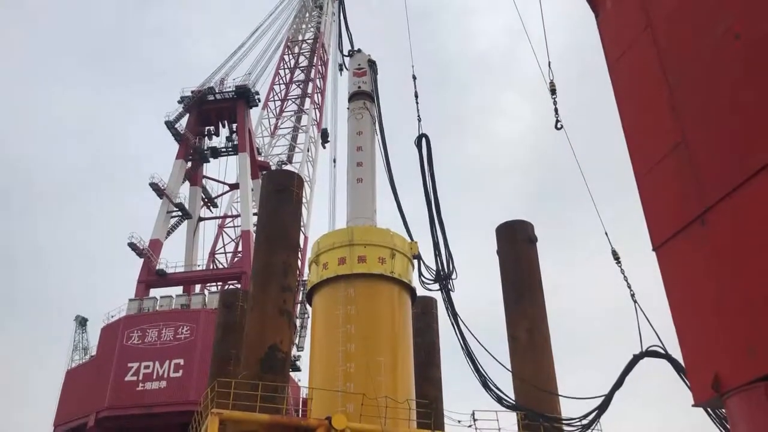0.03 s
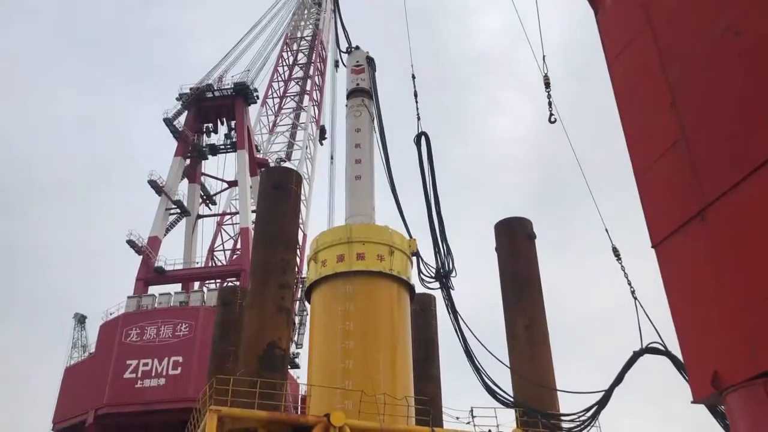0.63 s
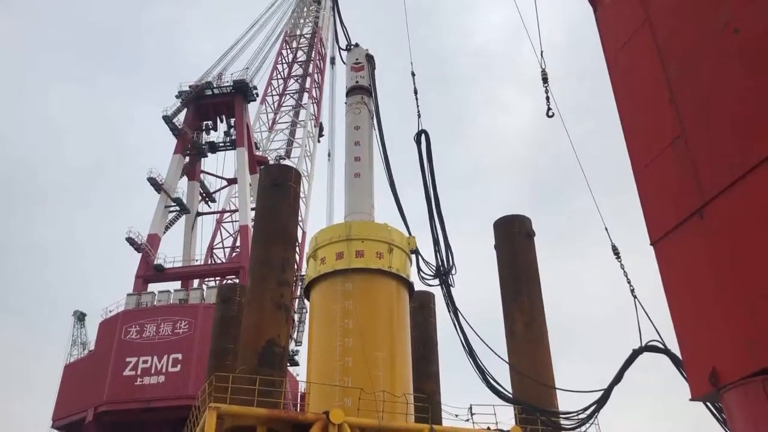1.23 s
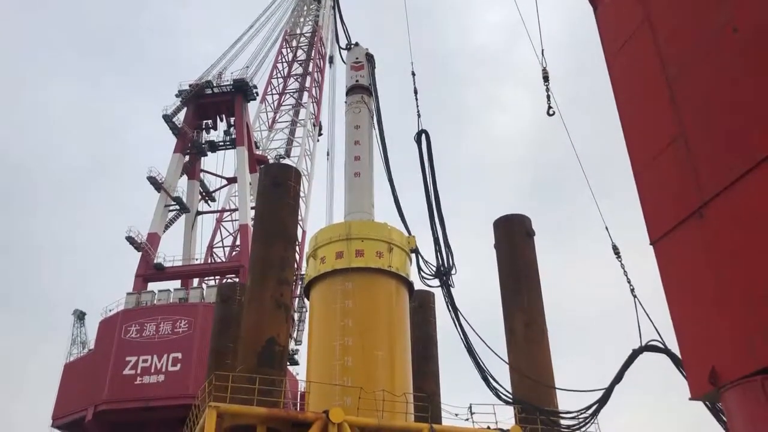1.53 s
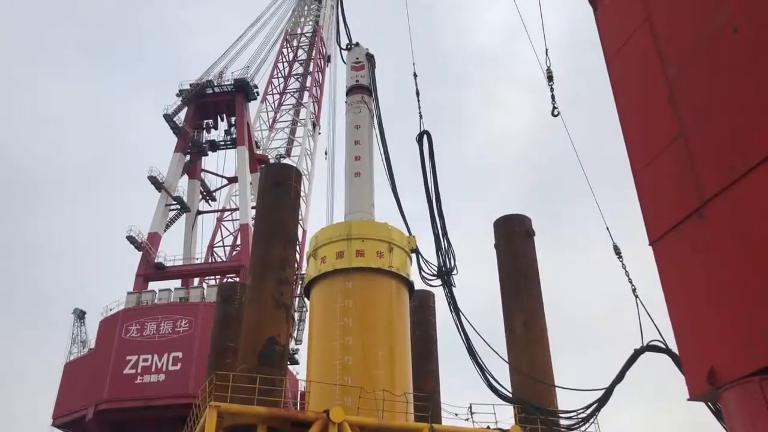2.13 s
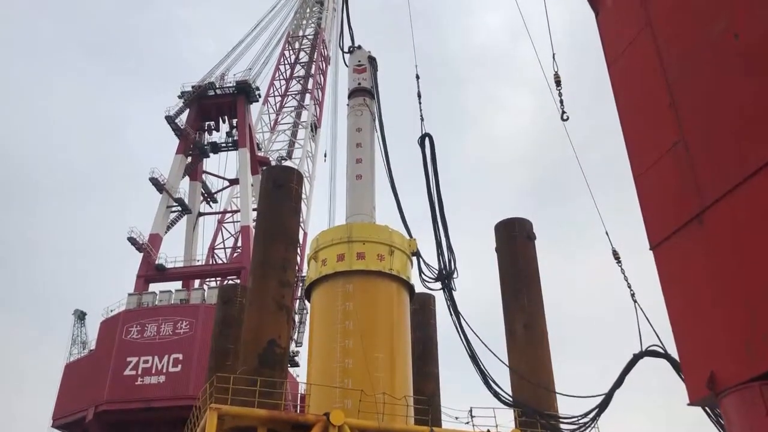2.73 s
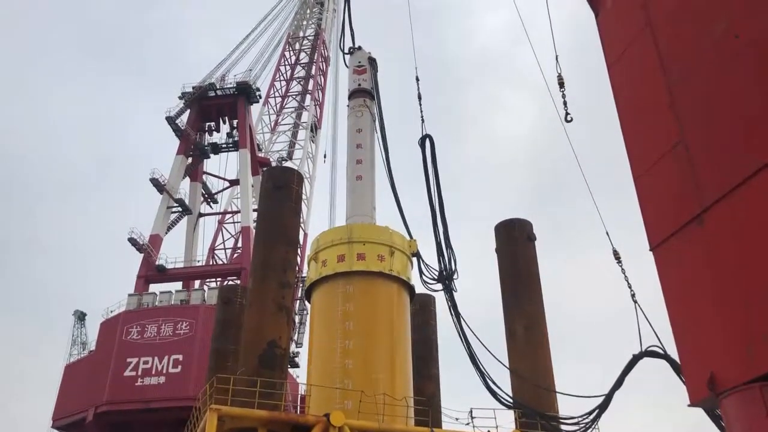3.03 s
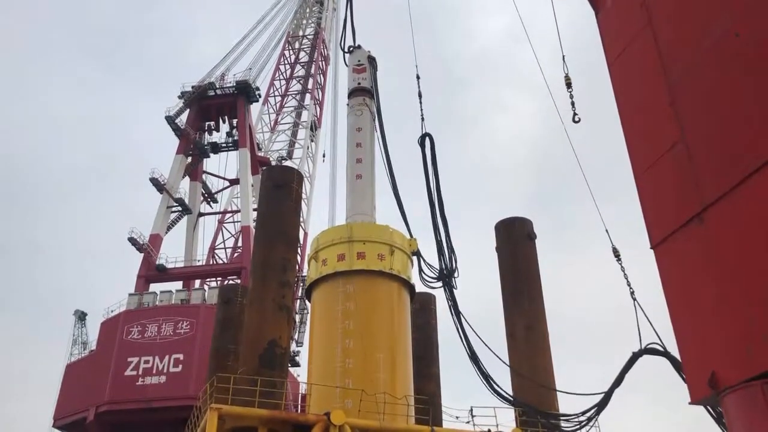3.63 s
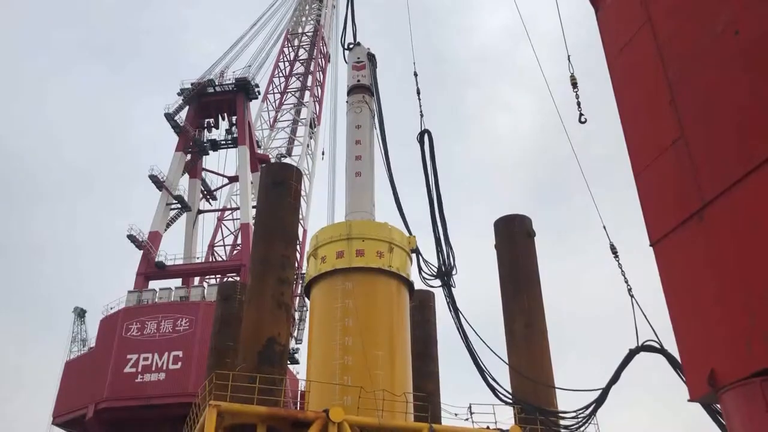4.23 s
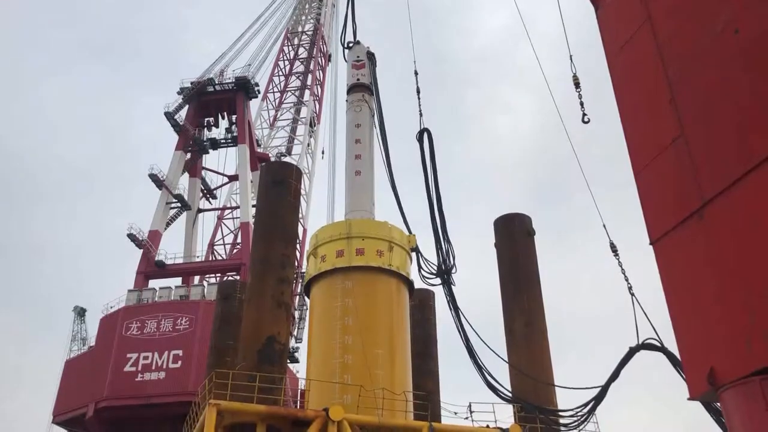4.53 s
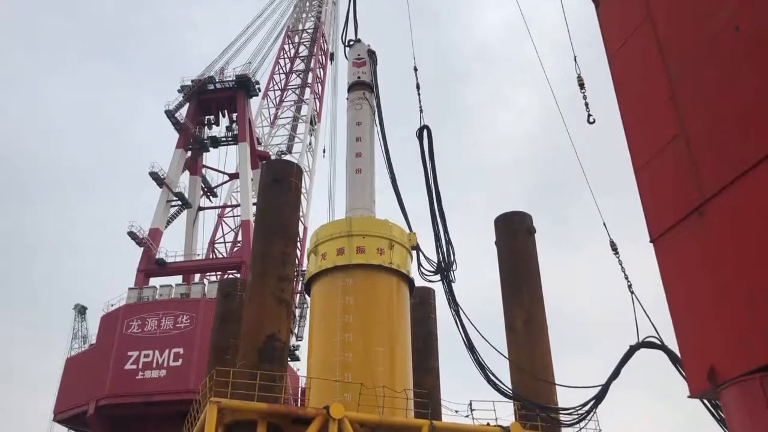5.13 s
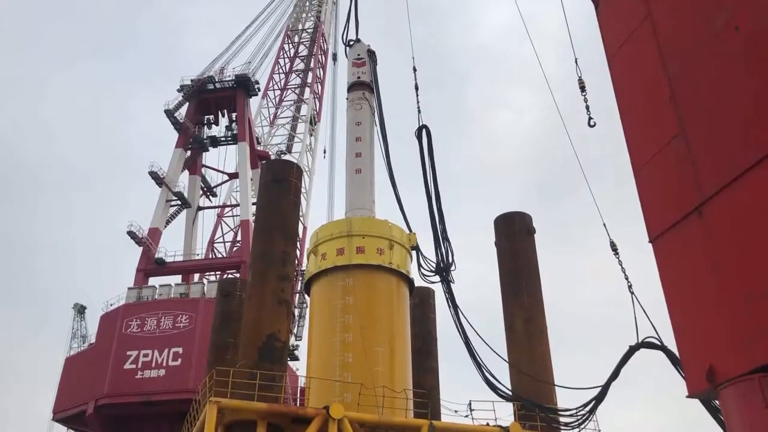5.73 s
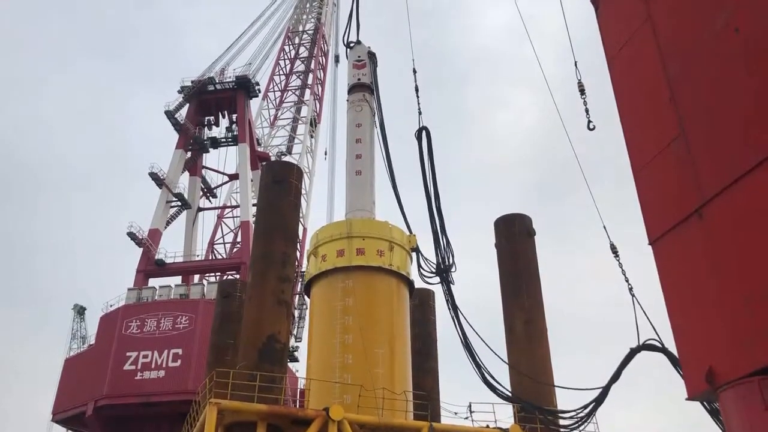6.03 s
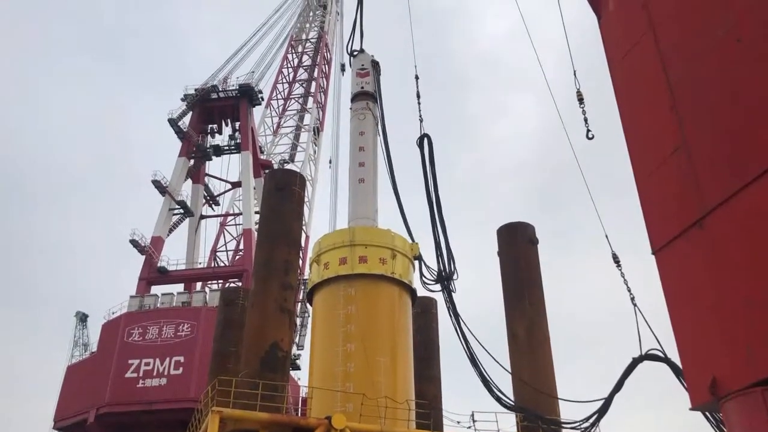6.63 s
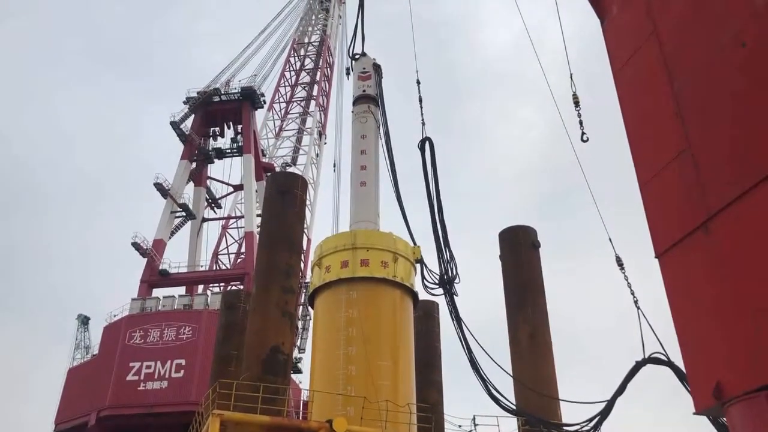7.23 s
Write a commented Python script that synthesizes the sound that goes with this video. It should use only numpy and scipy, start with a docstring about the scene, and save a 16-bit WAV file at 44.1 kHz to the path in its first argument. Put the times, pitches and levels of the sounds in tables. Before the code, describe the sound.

Heavy steel-on-steel pile driving strikes repeat steadily, each clanging and droning on, with faint valve clacks and machinery rumbling underneath.

```python
"""A hydraulic hammer drives a large steel pile, one blow every 1.31 s, heard from a nearby deck.
Each blow is a steel-on-steel crack, a clang from the pile head and a roll along the pile, almost the
same every time; the steel drones on between blows, and a loose part knocks on the later ones.
Valves clack as the ram is lifted and oil hisses as it nears the top.
Underneath, deck machinery rumbles and ticks."""
import sys
import numpy as np
from scipy import signal
from scipy.fft import rfft, irfft
from scipy.io import wavfile
from scipy.ndimage import uniform_filter1d, minimum_filter1d

SR = 44100
rng = np.random.default_rng(int(sys.argv[2]) if len(sys.argv) > 2 else 0)


def store_pcm(level_fs):
    """Save levels as 16-bit WAV."""
    pcm = np.round(np.clip(level_fs, -1, 1) * 32767).astype(np.int16)
    wavfile.write(sys.argv[1], SR, np.atleast_2d(pcm).T)


N = 330750
TIME = np.arange(N) / SR
AGE = TIME[:65536]  # seconds since a hit

# Hammer blows, each with the stroke after it; the first lands before the start and is still droning:
# start_s, level_db, crack_db, oil_db, tick_peak_after_s
BLOW_CUES = [(-1.085, 0, 0, -2, .95), (.2249, .3, 0, -2, .97), (1.5352, .3, 0, 0, .95),
             (2.8457, .3, 0, 1, .93), (4.1536, .8, 1.5, 2, .93), (5.4648, .5, 2, -2.5, 1.19),
             (6.7709, .3, -.5, -3, .85)]
# First crack of steel on steel: freq_hz, level_db_per_hz
CRACK_SPECTRUM = [(150, -41), (700, -41), (2000, -42), (3700, -48.8), (6000, -54.5), (9000, -54.5),
                  (15000, -61.5)]
# Short modes of the struck pile head: pitch_hz, level_db, t60_s
CLANG_MODES = [(145, -14, .14), (258, -10, .1), (430, -11, .1), (490, -18, .1), (716, -12, .11),
               (812, -18, .09), (968, -13, .085), (1128, -12, .085), (1270, -11, .08), (1425, -12, .075),
               (1572, -13, .07), (1700, -7, .06), (1870, -10.5, .055), (1970, -13, .035), (2197, -12, .055),
               (2365, -18.5, .05)]
# Long modes of the pile wall: pitch_hz, level_db, t60_s
WALL_MODES = [(79, -35, 4), (155, -29, 6), (178.5, -30, 1.8), (204, -26, 1.5), (235.5, -27, 6),
              (250.5, -22, 1.4), (269.5, -19, 1.1), (281, -20, 1.1), (390.5, -36, 6), (421, -26, 2),
              (433, -28, 2), (640, -29, 1.4), (662.5, -29, 1.4), (732.5, -26, 1.8), (951.5, -32, 1.3),
              (1002, -33, 1.3), (3013, -48, 1.4), (4352, -51, 1.6), (6060, -54, 2), (6290, -51, 1.8),
              (6440, -55, 2)]
# Dense ringing of pile, crane and hull: freq_hz, level_db_per_hz
ROLL_SPECTRUM = [(22, -66), (42, -54), (68, -47.8), (105, -49.5), (145, -43.5), (200, -39.8), (280, -37),
                 (345, -44.5), (420, -40), (560, -48), (1000, -50), (1650, -55.5), (2150, -64), (4000, -67),
                 (6300, -73.5), (9500, -79.5), (13000, -87), (15500, -88.5)]
# Tail of that ringing, band by band: freq_hz, t60_s
ROLL_DECAY = [(100, 1.3), (400, 1.2), (1500, 1.04), (5000, 1.05), (12000, 1.15)]
# Low drone that outlasts each blow: freq_hz, level_db_per_hz
DRONE_SPECTRUM = [(30, -92), (52, -73), (78, -57), (110, -65), (155, -53), (200, -61), (240, -54),
                  (345, -58.5), (430, -53.5), (530, -60), (760, -72), (1050, -69), (2000, -88)]
# Slaps of the crack and clang off crane and hull: delay_s, level_db
ECHO_TAPS = [(.039, -12), (.078, -18), (.127, -15)]
# The falling ram rubbing in its housing: freq_hz, level_db_per_hz
RAM_RUB_SPECTRUM = [(100, -52), (400, -54), (1000, -57), (1800, -69), (3500, -82), (8000, -93)]
# Knocks of a loose steel part: start_s, level_db
KNOCK_CUES = [(4.282, -3), (5.585, -5), (6.903, -3), (6.921, 0)]
# Colour of a knock: freq_hz, level_db_per_hz
KNOCK_SPECTRUM = [(500, -50), (1600, -49), (3000, -58.5), (6000, -67), (14000, -82)]
# The two valve clacks after every blow: delay_s, level_db
CLACK_CUES = [(.714, -4.5), (.757, .5)]
# Colour of a valve clack: freq_hz, level_db_per_hz
CLACK_SPECTRUM = [(300, -70), (1200, -70), (2200, -71), (4500, -77), (9000, -85), (15000, -99)]
# Rush of oil in the hoses: freq_hz, level_db_per_hz
OIL_SPECTRUM = [(500, -67), (1400, -75), (2600, -83.3), (4700, -86), (7000, -94.5), (14000, -108)]
# Steady bed of deck machinery: freq_hz, level_db_per_hz
RUMBLE_SPECTRUM = [(22, -97), (45, -80), (80, -62), (160, -58), (300, -58), (450, -62), (750, -71),
                   (1080, -68), (1500, -77), (2600, -86.7), (3800, -92), (4550, -90.5), (5800, -97),
                   (10000, -100), (15500, -107)]
# Colour of a shaft tick: freq_hz, level_db_per_hz
TICK_SPECTRUM = [(2000, -99), (3600, -92), (4550, -79), (5500, -96), (8300, -89), (11000, -87),
                 (12500, -95), (15500, -101)]


def hammer():
    """The ram lands, and every blow sets off nearly the same crack, clang, roll and drone."""
    out = np.zeros(N)
    contact, body, hull = (noise(len(AGE)) for _ in range(3))
    resonances = steel_resonances(len(AGE), ripple_db=3.2, spacing_hz=30)
    clang = np.zeros(len(AGE))
    add(clang, .003, ring(CLANG_MODES) * swell(.004))
    wall = ring(WALL_MODES) * swell(.025) + wall_surges()
    handover = np.clip((1.42 - AGE) / .1, 0, 1)  # the tail fades out as the next blow takes over
    echo_lowpass = signal.butter(1, 5000, fs=SR, output="sos")
    for start_s, level_db, crack_db, _, _ in BLOW_CUES:
        rub = ram_rub()
        add(out, start_s + .004 - len(rub) / SR, rub)  # peaks right at the impact
        attack = clang + undb(crack_db) * crack(contact)
        drone = colour(vary(hull, alike_hz=1200), DRONE_SPECTRUM) * swell(.05)
        tail = (roll(body, resonances) + wall + drone) * handover
        add(out, start_s, undb(level_db) * (attack + tail))
        echo = signal.sosfilt(echo_lowpass, attack)
        for delay_s, echo_db in ECHO_TAPS:
            add(out, start_s + delay_s, undb(level_db + echo_db) * echo)
    return out


def crack(pattern):
    """Steel meets steel: bending waves spread, so the treble arrives first and the lows a few ms later."""
    envelope = swell(.002) * (fade(.026, hold_s=.002) + undb(-15) * fade(.11))
    burst = colour(vary(pattern, alike_hz=5000) * envelope, CRACK_SPECTRUM)
    delay_s = .0036 / (1 + (bin_hz(len(burst)) / 3500) ** 2)
    lag_cycles = np.cumsum(delay_s) * SR / len(burst)
    return irfft(rfft(burst) * np.exp(-2j * np.pi * lag_cycles), len(burst))


def ring(modes):
    """Struck steel rings as decaying sines, each in its own phase."""
    return sum(undb(level_db) * fade(t60_s) * np.sin(2 * np.pi * (pitch_hz * AGE + rng.random()))
               for pitch_hz, level_db, t60_s in modes)


def roll(pattern, resonances):
    """Countless modes stay fed while the wave runs up and down the pile, then fade band by band."""
    spectrum = resonances * rfft(colour(vary(pattern, alike_hz=2000), ROLL_SPECTRUM))
    centres_hz, t60s = np.transpose(ROLL_DECAY)
    log_hz = np.log(bin_hz(len(AGE)))
    out = np.zeros(len(AGE))
    for solo, t60_s in zip(np.eye(len(centres_hz)), t60s):
        crossover = np.interp(log_hz, np.log(centres_hz), solo)
        out += irfft(spectrum * crossover, len(AGE)) * fade(t60_s, hold_s=.125)
    return swell(.009) * out


def wall_surges(pitch_hz=305.5, first_peak_s=.101, round_trip_s=.278, trip_loss_db=5.5):
    """The strongest wall wave hums along the pile and surges twice, beating as it passes."""
    half_width_s, beat_s, beat_depth = .062, .053, .3
    envelope = undb(-30) * swell(.025) * fade(t60_s=5)  # the hum under the surges
    for trip in range(2):
        since_s = AGE - first_peak_s - trip * round_trip_s
        surge = undb(-11.5 - trip * trip_loss_db) * np.exp(-(since_s / half_width_s) ** 2)
        beat = 1 - beat_depth * (1 - np.cos(2 * np.pi * since_s / beat_s))
        envelope += surge * beat
    return envelope * np.sin(2 * np.pi * pitch_hz * AGE)


def ram_rub():
    """The falling ram rubs in its housing: a short reverse swell into the hit."""
    return (colour(noise(len(AGE)), RAM_RUB_SPECTRUM) * fade(.28))[::-1]


def knocks():
    """A loose steel part rattles in short, dry bursts."""
    out = np.zeros(N)
    for start_s, level_db in KNOCK_CUES:
        burst = noise(len(AGE)) * swell(.001) * fade(.05)
        add(out, start_s, undb(level_db) * colour(burst, KNOCK_SPECTRUM))
    return out


def hydraulics():
    """Valves clack twice in mid stroke, then oil rushes up and eases until the ram falls."""
    out = np.zeros(N)
    oil_peak_s = 1.07
    flow_db = crest_db(AGE - oil_peak_s, rise_db_per_s=115, sag_db_per_s=27)
    oil_envelope = undb(flow_db) * fade(.1, hold_s=1.31)
    clack_envelope = swell(.004) * fade(.15, hold_s=.012)
    for start_s, _, _, oil_db, _ in BLOW_CUES:
        hiss = oil_envelope * colour(noise(len(AGE)), OIL_SPECTRUM)
        add(out, start_s, undb(oil_db) * hiss)
        for delay_s, clack_db in CLACK_CUES:
            clack = clack_envelope * colour(noise(len(AGE)), CLACK_SPECTRUM)
            add(out, start_s + delay_s, undb(clack_db) * clack)
    return out


def deck_rumble():
    """Deck machinery rumbles through the steel, its level wavering slightly."""
    knots_s = np.arange(0, TIME[-1] + 1, .1)
    waver_db = .8 * np.interp(TIME, knots_s, noise(len(knots_s)))
    spectrum = rfft(colour(noise(N), RUMBLE_SPECTRUM))
    resonances = steel_resonances(N, ripple_db=2.5, spacing_hz=45)
    return undb(waver_db) * irfft(spectrum * resonances, N)


def shaft_ticks(turn_hz=32.86, size=2048):
    """An uneven, squeaky tick once a shaft turn; each rub catches other resonances."""
    out = np.zeros(N)
    offset_s = (np.arange(size) - size / 2) / SR
    envelope = np.exp(-(offset_s / .005) ** 2)
    for centre_s in np.arange(.0133, TIME[-1], 1 / turn_hz):
        spectrum = rfft(colour(noise(size), TICK_SPECTRUM))
        rub = irfft(spectrum * steel_resonances(size, ripple_db=4.5, spacing_hz=300), size)
        gain = undb(tick_ride_db(centre_s) + 1.6 * rng.standard_normal())
        jitter_s = .001 * rng.standard_normal()
        add(out, centre_s + offset_s[0] + jitter_s, gain * rub * envelope)
    return out


def tick_ride_db(time_s, quiet_db=-10, loud_db=-1.5):
    """Fader ride on the ticking: it swells late in every stroke and slowly sinks back."""
    swells_db = [crest_db(time_s - start_s - peak_after_s, rise_db_per_s=38, sag_db_per_s=7)
                 for start_s, _, _, _, peak_after_s in BLOW_CUES]
    return max(quiet_db, loud_db + max(swells_db))


def steel_resonances(size, ripple_db, spacing_hz):
    """Gain per bin: countless narrow resonances of the steel, scattered over the treble."""
    hz = bin_hz(size)
    knots_hz = np.arange(0, SR / 2, spacing_hz)
    depth_db = ripple_db * hz / (hz + 1000)
    ripple = np.interp(hz, knots_hz, noise(len(knots_hz)))
    trim_db = depth_db ** 2 / 13  # offsets the power that the peaks add
    return undb(depth_db * ripple - trim_db)


def vary(pattern, alike_hz):
    """A variation on a vibration: long waves repeat from blow to blow, short ones come out anew."""
    size = len(pattern)
    shared = 1 / (1 + (bin_hz(size) / alike_hz) ** 2)
    return irfft(rfft(pattern) * np.sqrt(shared) + rfft(noise(size)) * np.sqrt(1 - shared), size)


def colour(white, curve):
    """EQ white noise to a curve of (freq_hz, level_db_per_hz), rolling off beyond both ends."""
    points_hz, points_db = np.transpose(curve)
    hz = bin_hz(len(white))
    gain = undb(np.interp(np.log(hz), np.log(points_hz), points_db))
    skirts = np.minimum(1, np.minimum(hz / points_hz[0], points_hz[-1] / hz)) ** 2
    return irfft(rfft(white) * gain * skirts, len(white)) * np.sqrt(SR / 2)


def swell(rise_s):
    """Attack envelope, building from silence."""
    return 1 - np.exp(-AGE / rise_s)


def fade(t60_s, hold_s=0):
    """Envelope that holds, then dies away."""
    return np.exp(-np.log(1000) * np.maximum(AGE - hold_s, 0) / t60_s)


def crest_db(since_peak_s, rise_db_per_s, sag_db_per_s):
    """Level that climbs to 0 dB at its peak, then sags."""
    return np.minimum(rise_db_per_s * since_peak_s, -sag_db_per_s * since_peak_s)


def noise(size):
    """Unit white noise."""
    return rng.standard_normal(size)


def undb(db):
    """Decibels to gain."""
    return 10 ** (np.asarray(db) / 20)


def bin_hz(size):
    """Frequency of each bin, plus 1 Hz to stay clear of zero."""
    return np.fft.rfftfreq(size, 1 / SR) + 1


def add(out, start_s, sound):
    """Mix a sound in at its cue, trimming any overhang."""
    start = int(round(start_s * SR))
    first, end = max(start, 0), min(start + len(sound), len(out))
    if end > first:
        out[first:end] += sound[first - start:end - start]


def scene():
    """Mono mix: hammer up front, hydraulics and deck behind it."""
    return (hammer() + knocks() + hydraulics() + deck_rumble() + shaft_ticks())[None]


def record(dry):
    """A limiter holds down the peaks of the blows, then a steep low-pass cuts the top."""
    ceiling, top_hz = .66, 15750
    needed_gain = np.minimum(1, ceiling / (np.abs(dry) + 1e-9))
    smooth_gain = uniform_filter1d(minimum_filter1d(needed_gain, size=121), size=121)
    lowpass = signal.ellip(8, .2, 70, top_hz, fs=SR, output="sos")
    return signal.sosfilt(lowpass, dry * smooth_gain)


dry = scene()
out = record(dry)
store_pcm(out)
```